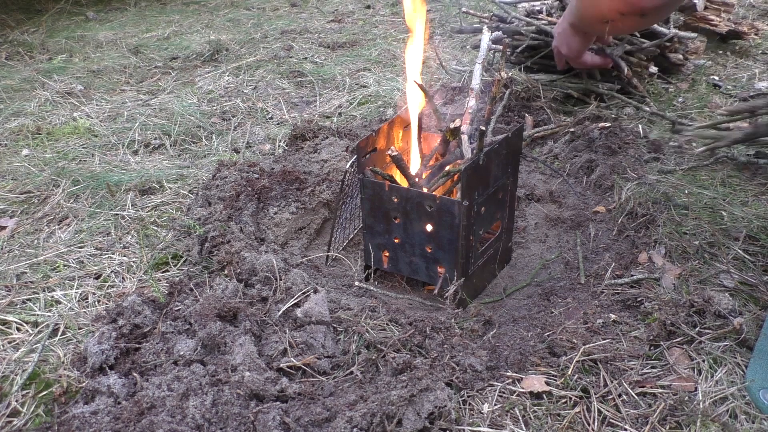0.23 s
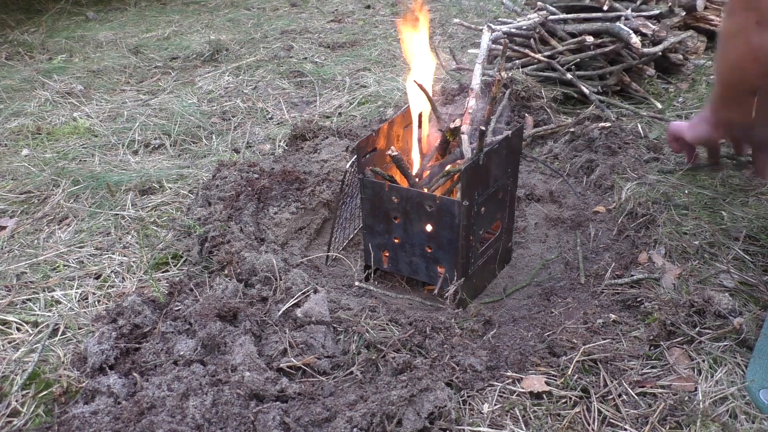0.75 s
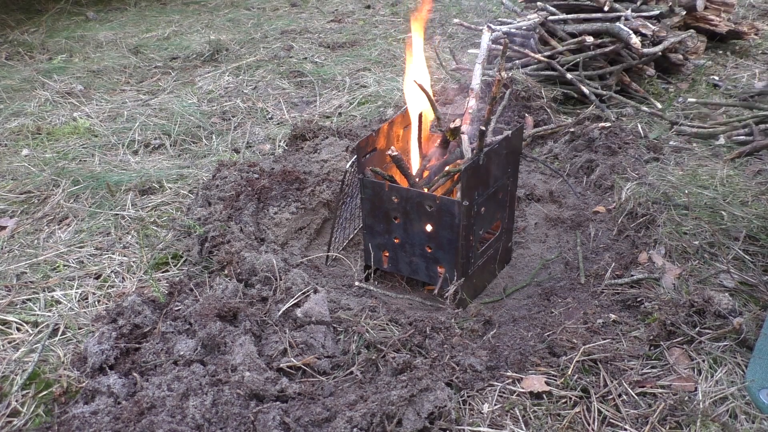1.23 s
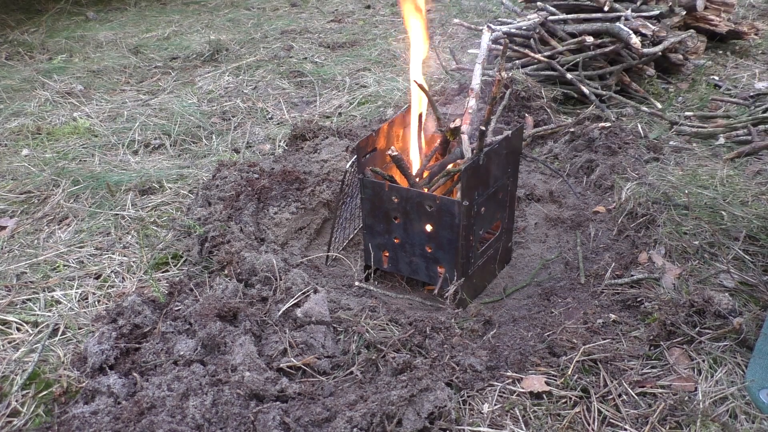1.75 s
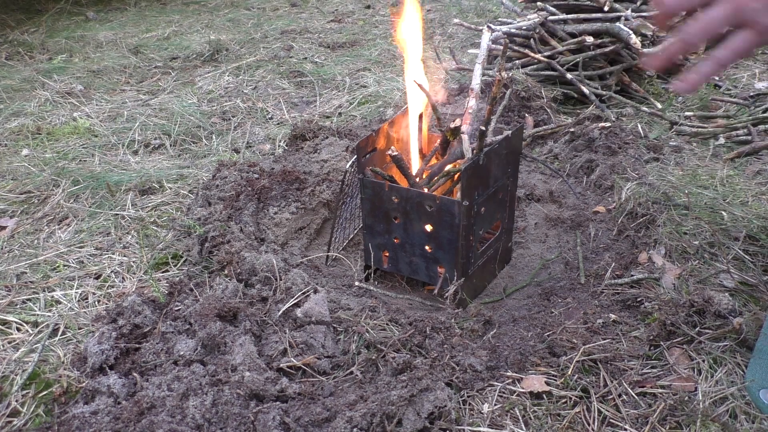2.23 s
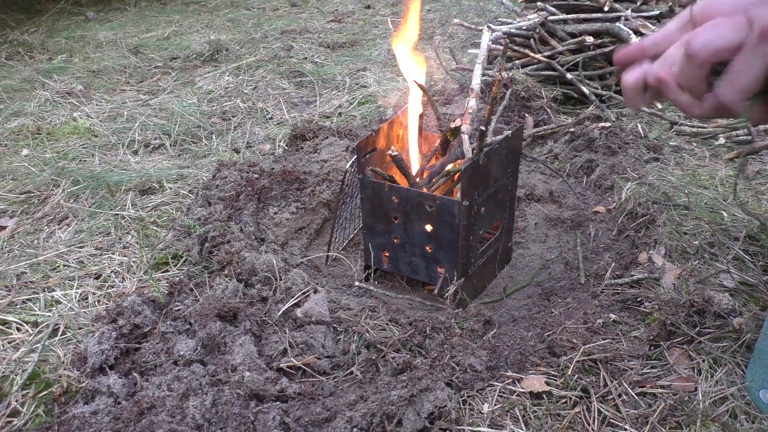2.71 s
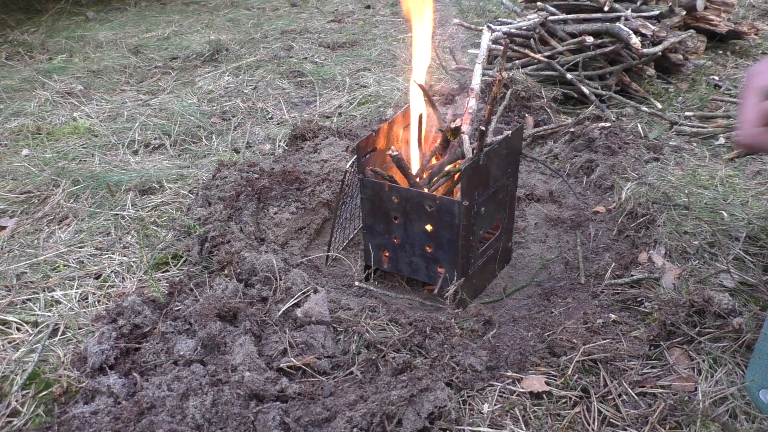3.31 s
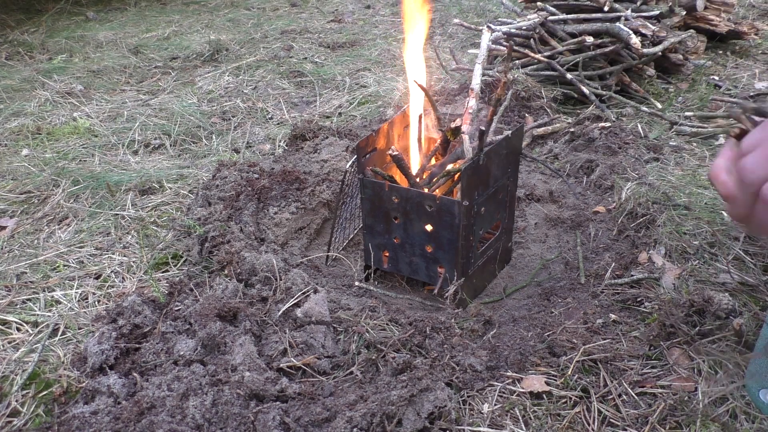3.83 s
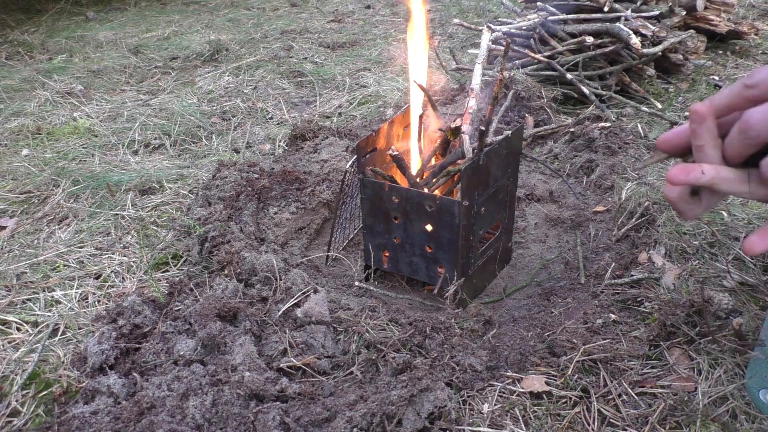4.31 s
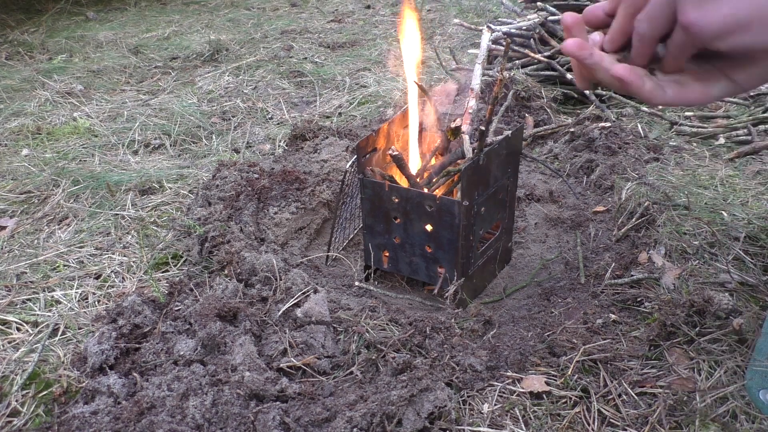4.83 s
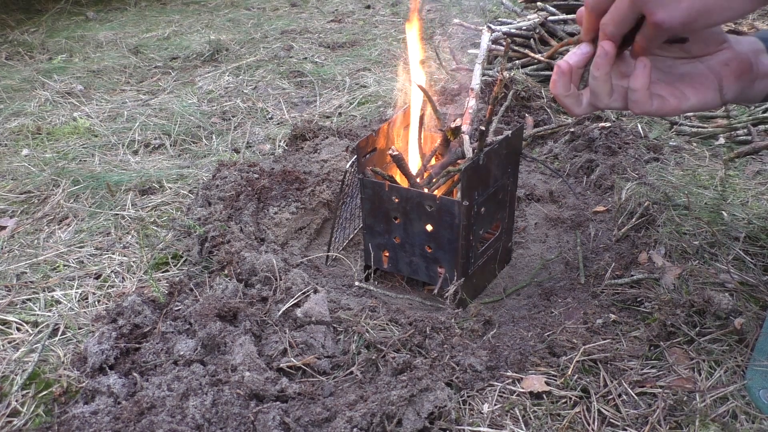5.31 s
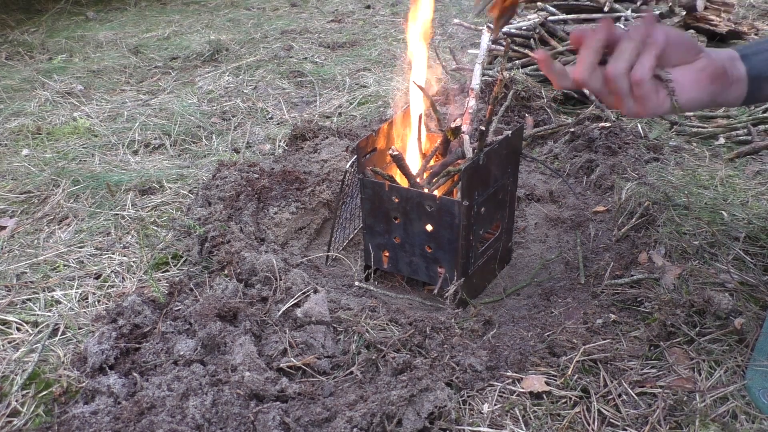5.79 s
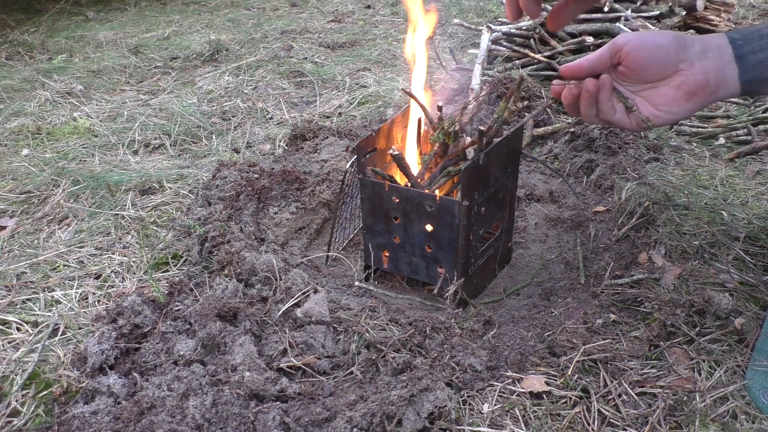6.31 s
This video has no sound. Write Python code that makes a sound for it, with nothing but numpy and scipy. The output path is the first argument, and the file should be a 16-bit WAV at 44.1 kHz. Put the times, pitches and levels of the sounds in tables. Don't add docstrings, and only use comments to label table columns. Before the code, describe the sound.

Crackly bark rustle and dry knocks of twig on twig open the scene, then calm to soft thuds on the ground. Hard, bright wood cracks burst out in the middle, the loudest about three seconds in, followed by scraping and small splintery ticks. Later a faint metallic tap, hollow breathy fire flutter, and twigs clattering into a sheet-metal stove. Open air, dry, nearly mono, close microphone whose level ducks after loud snaps.

```python
import sys
import numpy as np
from scipy import signal
from scipy.fft import rfft, irfft, next_fast_len
from scipy.io import wavfile

SR = 44100
rng = np.random.default_rng(int(sys.argv[2]) if len(sys.argv) > 2 else 0)


def level_to_linear(level):
    exponent = np.asarray(level, float) / 20
    return 10 ** exponent


def transcribe(signal):
    frames = np.atleast_2d(signal).T
    limited = np.clip(frames, -1, 1)
    pcm = np.round(limited * 32767).astype(np.int16)
    wavfile.write(sys.argv[1], SR, pcm)


N = 288844


def rms_one(x):
    return x / np.sqrt(np.mean(x ** 2) + 1e-20)


def peak_one(x):
    return x / np.abs(x).max()


def in_time(rows):
    s, *columns = np.transpose(rows)
    return [np.interp(np.arange(N) / SR, s, column) for column in columns]


def colour(x, points):
    hz, db = np.transpose(points)
    size = 2 * next_fast_len(len(x) // 2 + 1, real=True)
    grid = np.maximum(np.fft.rfftfreq(size, 1 / SR), 1)
    gain = level_to_linear(np.interp(np.log(grid), np.log(hz), db))
    folded = irfft(np.log(gain), size)
    folded[1:size // 2] *= 2
    folded[size // 2 + 1:] = 0
    return irfft(rfft(x, size) * np.exp(rfft(folded)), size)[:len(x)]


def shaped_noise(points):
    return rms_one(colour(rng.standard_normal(N), points))


def bandpass(x, low_hz, high_hz):
    return signal.lfilter(*signal.butter(2, [low_hz, min(high_hz, .48 * SR)], "band", fs=SR), x)


def drift(rate):
    r = np.exp(-40 * np.pi * rate / SR)
    slow = signal.lfilter([1], [1, -2 * r, r * r], rng.standard_normal(N // 20 + 2002))[2000:]
    return np.interp(np.arange(N) / 20, np.arange(len(slow)), rms_one(slow))


def ring(clicks, hz, t60):
    r = level_to_linear(-60 / (t60 * SR))
    w = 2 * np.pi * min(hz, .45 * SR) / SR
    return signal.lfilter([0, np.sin(w)], [1, -2 * r * np.cos(w), r * r], clicks + 1e-18)


def add(track, s, sound):
    i = round(s * SR)
    track[i:i + len(sound)] += sound[:len(track) - i]


def crack(fibres, wood_hz, splinter_db, low_db, ms, cycles, first, after_db, tail_db):
    splinter_hz = [7600, 8760, 13600]
    t = np.arange(len(fibres)) / SR * 1000
    dying = np.exp(-t / max(ms, .1)) + level_to_linear(after_db) * np.exp(-t / 1.84) + level_to_linear(tail_db) * np.exp(-t / 5.0)
    run = fibres * np.abs(fibres) * dying
    run[4] += first
    wood = bandpass(ring(run, wood_hz, cycles / wood_hz), 0.35 * wood_hz, 21000)
    wood = bandpass(wood, 0.56 * wood_hz, 2.56 * wood_hz)
    splinter = bandpass(run, 1900, 21000) + 0.33 * sum(ring(run, hz, 1.74 / hz) for hz in splinter_hz)
    splinter = bandpass(splinter, 4680, 18160)
    low = bandpass(run, 200, 2170)
    return peak_one(wood) - level_to_linear(splinter_db) * peak_one(splinter) + level_to_linear(low_db) * peak_one(low)


def twigs(rows, trim_db, **make):
    out = np.zeros(N)
    for (s, db, *kind), fibres in zip(rows, rng.standard_normal((len(rows), 1500))):
        add(out, s, level_to_linear(db + trim_db) * crack(fibres, *kind, **make))
    return out


def gliding_noise(rows, half_width_hz):
    db, hz = in_time(rows)
    t = np.arange(N) / SR
    rub = signal.lfilter(*signal.butter(2, half_width_hz, fs=SR), rng.standard_normal((2, N)))
    wander = 0.048 * drift(25.9)
    turn = 2 * np.pi * np.cumsum(hz * (1 + wander)) / SR
    moved = rms_one(rub[0] * np.cos(turn) + rub[1] * np.sin(turn))
    return (t > rows[0][0]) * (t < rows[-1][0]) * level_to_linear(db) * moved


def air():
    # frequency in Hz, level in dB per Hz
    air_tone = [(180, -28), (300, -3.5), (722, -9), (797, -7.5), (895, -8.5), (1820, -17), (2300, -18.5),
                (5810, -24), (15700, -21.5)]
    return shaped_noise(air_tone) * level_to_linear(-62 - 1.5 + 0.44 * drift(1.2))


def flame():
    # time in seconds, level in dB
    flutter = [(0.0, -51.5), (0.88, -53), (1.37, -48.5), (1.73, -50.5), (2.13, -50.5), (3.1, -52.5),
               (3.41, -56), (3.72, -52), (4.05, -51), (4.9, -52.5), (5.47, -49.5), (5.8, -49), (6.0, -48.5),
               (6.55, -50)]
    # frequency in Hz, level in dB per Hz
    flame_tone = [(8.8, -32), (15, -3), (43, 3), (119, -0.5), (150, -2), (227, -8), (283, -16), (330, -18),
                  (430, -56), (730, -120)]
    flame_db, = in_time(flutter)
    return shaped_noise(flame_tone) * level_to_linear(flame_db + 1.5 + 0.96 * drift(5.0))


def hollow_drone():
    # time in seconds, level in dB
    swells = [(0, -80), (.33, -56), (.42, -71), (1.55, -64), (1.7, -54), (1.9, -66), (4.3, -63),
              (4.55, -55), (4.8, -65), (5.0, -50), (5.25, -64.5), (5.55, -50), (5.72, -59), (5.9, -49),
              (6.1, -62), (6.55, -56)]
    return gliding_noise([(*row, 150) for row in swells], 12)


def strokes(rows, rise_db_s, fall_db_s):
    t, out = np.arange(N) / SR, 0
    for s, hold, db, fine_db, dull_db in rows:
        away_db = rise_db_s * np.maximum(s - t, 0) + fall_db_s * np.maximum(t - s - hold, 0)
        out = out + level_to_linear(2 * (db - away_db)) * level_to_linear(2 * np.array([[0], [fine_db], [dull_db]]))
    return out


def effort():
    # start in seconds, hold in seconds, bark level in dB,
    # fine scrape in dB re bark, dull knock in dB re bark.
    rubs = [(0.0, 0.032, -46.5, -4.5, -8), (.43, .03, -64, -0.5, -12), (1.57, 0.036, -66, 0.5, -15),
            (.86, 0.021, -64, 1, -1), (1.36, 0.0092, -60, -4.5, 5), (2.21, 0.026, -61, -6.5, -16),
            (2.625, 0.014, -57, -4, -6), (2.735, 0.016, -66.5, 5, -17), (2.94, 0.026, -59, -0.5, -17),
            (3.34, 0.013, -46, -2, -17.5), (3.77, 0.022, -67, -7, 13), (3.92, 0.026, -54, -12, -8),
            (3.97, 0.069, -51.5, -1.5, -2), (4.5, 0.089, -58, -0.5, 2.5), (4.7, 0.025, -65.5, 3, -10),
            (4.87, 0.005, -63, 3, -10), (5.14, .02, -62, -1.5, 0), (5.27, 0.13, -66.5, -2.5, -0.5),
            (6.24, 0.0052, -63.5, -1, 6)]
    drags = [
        (.13, 0.053, -57, 4.5, -2.5),
        (.22, 0.11, -56, -5, -5.5),
        (.5, 0.12, -50, -7.5, -5),
        (1.645, 0.083, -57, -5, -20),
        (2.28, 0.016, -64.5, -26, 7.5),
        (3.38, 0.22, -57, 5.5, 2),
        (6.4, 0.016, -59, -27, 8),
    ]
    jolts = [
        (.645, 0.013, -61, 0.5, -10),
        (1.2, 0.049, -47.5, -12, -1),
        (2.044, 0.0098, -41.5, 1, -6),
        (2.329, 0.0031, -48, 6.5, 2),
        (3.1, 0.0073, -53.5, 8.5, -31),
        (3.232, 0.03, -52, 10.5, -15),
        (6.03, .004, -56.5, 2.5, 10),
        (6.165, 0.004, -53, -15, 5.5),
    ]
    scrapes = [(2.419, .021, -43, -12, -26), (2.475, .026, -47, -9, -20), (2.82, .07, -58, 3, -3),
               (3.068, .012, -50, 4, -15), (3.26, .04, -53, -2, -8), (3.687, .014, -57, -2, 14),
               (4.056, .022, -53, 3, -3), (4.31, .07, -58, 3, -8), (5.99, .025, -67, 3, -2),
               (6.068, .036, -52, -5, 0.5), (6.146, .022, -47, -1, -8)]
    # bark, fine and dull level [dB]
    resting_db = [-69, -72.5, -64]
    moving = strokes(rubs, 100, 110) + strokes(drags, 186, 910)
    moving = moving + strokes(jolts, 2509, 242) + strokes(scrapes, 2509, 910)
    return 10 * np.log10(moving + level_to_linear(2 * np.array(resting_db))[:, None])


def grains(low_hz, high_hz, per_s, clumps, uneven_db, cycles, patchy_db):
    sizes = level_to_linear(uneven_db * np.minimum(rng.exponential(1, N), 4)) * rng.choice([-1, 1], N)
    born = rng.random(N) < per_s * clumps / SR
    dealt = rng.integers(0, 12, N)
    patches = level_to_linear(patchy_db * rng.standard_normal((12, N // 1100 + 1)))[dealt, np.arange(N) // 1100]
    hits = sizes * born * patches
    pitches = np.geomspace(low_hz, high_hz, 12)
    return rms_one(sum(ring(hits * (dealt == k), hz, cycles / hz) for k, hz in enumerate(pitches)))


def rustle():
    bark_db, fine_db, dull_db = effort()
    slip = level_to_linear(1.3 * drift(90) + .3 * drift(16))
    bark = grains(1940, 4370, 4000, slip, uneven_db=3.5, cycles=6.6, patchy_db=2.5) * level_to_linear(bark_db - 1.98)
    fine = grains(4140, 18000, 8000, slip, uneven_db=2.4, cycles=4.3, patchy_db=5.0) * level_to_linear(fine_db + 0.67)
    dull = grains(394, 1460, 2200, slip, uneven_db=2.0, cycles=5.5, patchy_db=3.5) * level_to_linear(dull_db - 3.0)
    return slip * (bark + fine + dull)


def crackles():
    # start in seconds, peak in dB, wood pitch in Hz
    stray = [(.012, -39, 2300), (.043, -38, 3000), (.052, -47, 2000), (.1521, -35, 6500), (.168, -37, 2500),
             (.18, -36, 4230), (.236, -35.5, 7000), (.25, -43, 7000), (.298, -40, 7500), (.4953, -42, 2260),
             (.5, -38, 2420), (.565, -30.5, 2500), (.6594, -44, 4240), (3.261, -35, 600),
             (3.293, -31, 1100), (3.348, -25, 2230), (3.385, -40, 980), (3.405, -43, 810),
             (3.4878, -38, 4940), (3.555, -33.5, 2980), (3.752, -46, 5040), (3.845, -46, 7500),
             (3.876, -40, 1900), (3.926, -36, 3000), (3.976, -36.5, 1500), (4.014, -33.5, 2000),
             (4.178, -42, 2500), (4.262, -41, 7000), (4.325, -42, 2500), (4.371, -41, 2220),
             (4.676, -43.5, 2100), (4.722, -57, 4500), (6.003, -44, 910), (6.074, -40, 660),
             (6.086, -38, 2500), (6.228, -56, 980), (6.366, -44, 3720), (6.483, -50, 754)]
    return twigs(stray, -2.4, splinter_db=-9.5, low_db=-24, ms=1.3,
                 cycles=7.8, first=1.2, after_db=-12.5, tail_db=-23)


def raps():
    # start in seconds, peak in dB, wood pitch in Hz
    dull_raps = [(.0195, -39, 5000), (.0445, -36, 3700), (.289, -37.5, 2500), (.5885, -33, 3600),
                 (.589, -36.5, 1500), (.631, -36, 2310), (.637, -36, 2500), (1.206, -44, 3000),
                 (1.2845, -42, 2500), (1.347, -42, 2700), (1.41, -47, 3320), (6.147, -35, 3020),
                 (6.028, -36.5, 326)]
    return twigs(dull_raps, -2.5, splinter_db=-28, low_db=-24, ms=2.0,
                 cycles=10.0, first=1.4, after_db=-15, tail_db=-20)


def small_ticks():
    # start in seconds, peak in dB, wood pitch in Hz.
    flecks = [(.03, -32, 4610), (.0946, -29, 6260), (2.02, -48, 6760), (2.0524, -30, 8700),
              (2.167, -40, 9000), (2.7898, -34.5, 7500), (3.0694, -29, 7900), (3.2022, -29, 6460),
              (3.223, -26, 4740), (3.26, -38, 7560), (3.5452, -39, 4500), (3.839, -41, 8100),
              (3.9932, -27, 8230), (4.145, -44, 7900), (4.1516, -29.5, 7920), (4.265, -38, 8000),
              (4.4885, -38.5, 4980), (4.5298, -38, 5710), (4.82, -37.5, 4610), (5.77, -46, 3960),
              (5.792, -39.5, 8230), (6.0, -34.5, 7800), (6.007, -53, 8980)]
    ticks = [(.2153, -45, 2540), (.235, -40.5, 2290), (.5116, -36, 2270), (.5407, -36, 2970),
             (6.0975, -37.5, 3520), (.6167, -38, 3300), (1.213, -43, 2000), (.8361, -45.5, 2760),
             (1.2054, -58, 3060), (1.687, -40, 3220), (1.7976, -49, 3160), (2.082, -33, 1510),
             (2.4287, -29.5, 3100), (2.4965, -35, 2620), (2.665, -35, 2760), (2.8406, -40, 2540),
             (3.3404, -36, 2180), (3.593, -32, 2880), (3.6897, -40, 1300), (4.0306, -32, 3900),
             (4.111, -35, 2200), (4.29, -40.5, 1040), (6.0737, -33, 3720), (6.3636, -40, 770),
             (6.398, -50, 3560)]
    splits = [(.27, -43, 2460), (.3147, -43.5, 4730), (1.1988, -57, 1560), (1.2506, -37, 1700),
              (2.6127, -47.5, 2130), (2.7247, -51, 3220), (2.8197, -48, 2760), (3.9143, -36, 3900),
              (3.966, -39, 4600), (4.135, -37.5, 1010), (4.342, -43, 8100), (4.9852, -49.5, 3900),
              (5.239, -55, 5860), (5.2687, -52, 4600), (5.3772, -49, 4000), (5.4173, -46, 4700),
              (5.6461, -51.5, 958), (5.782, -53, 3490), (5.912, -54.5, 12000), (5.9837, -40.5, 2130),
              (6.0859, -35, 6100), (6.099, -41, 1360)]
    knocks = [(.2873, -48, 2930), (.5462, -41, 2140), (.8687, -52, 860), (1.2224, -37.5, 1330),
              (1.281, -45, 1760), (1.362, -44, 3020), (1.409, -58, 2840), (2.0769, -31, 1320),
              (2.123, -42, 1390), (2.2557, -46, 2440), (2.2808, -51, 915), (2.453, -42.5, 1720),
              (2.9427, -46.5, 3230), (3.7523, -49, 1700), (3.8546, -47.5, 1174), (4.0567, -44, 1071),
              (4.1722, -40.5, 1650), (5.672, -49.5, 2400), (6.0277, -40, 829), (6.1267, -46, 2220),
              (6.2284, -46, 4870)]
    soft = dict(cycles=7.6, first=0.92, after_db=-17.5, tail_db=-14.0)
    out = twigs(flecks, -3.5, splinter_db=-13.5, low_db=-11, ms=0.82, **soft)
    out += twigs(ticks, -1.5, splinter_db=-5.5, low_db=-6.5, ms=1.9, **soft)
    out += twigs(splits, -0.77, splinter_db=3.5, low_db=1.0, ms=1.8, **soft)
    out += twigs(knocks, -3.0, splinter_db=-0.5, low_db=7.5, ms=2.7, **soft)
    return out


def pops():
    # start in seconds, peak in dB, wood pitch in Hz
    dry_pops = [(.5763, -37, 3900), (1.2255, -29.5, 2500), (1.2385, -35, 4500), (1.362, -41, 4000),
                (1.39, -46, 5000), (1.687, -41, 6000), (1.715, -43, 1800), (1.77, -46, 2000),
                (4.136, -32, 1990), (4.172, -34, 2620), (5.16, -43, 4000), (5.239, -42, 5900),
                (5.27, -43, 2500), (5.3772, -36.5, 3020), (5.4165, -39.5, 3500), (5.465, -51, 3500),
                (5.778, -47, 7200), (6.228, -42, 4900), (6.397, -38, 2800), (6.365, -42, 2000),
                (5.9837, -35, 3380), (.031, -35, 3500), (.5116, -32.5, 1600), (.5475, -41, 3000),
                (.617, -35, 2000), (3.0895, -39, 5000), (3.111, -41, 4000)]
    return twigs(dry_pops, -1.9, splinter_db=-7.5, low_db=-7, ms=0.13,
                 cycles=2.7, first=7.7, after_db=-21, tail_db=-40)


def specks():
    # start in seconds, peak in dB, pitch in Hz
    bright = [(.279, -38, 10000), (.4715, -45, 8000), (.479, -45, 7500), (.4955, -43, 9000),
              (2.988, -42, 9000), (2.996, -38, 12000), (3.113, -40, 13000), (3.342, -33, 7500),
              (4.145, -36, 8000), (4.342, -30.5, 10000), (4.82, -46, 6600), (5.984, -38, 7950),
              (5.99, -40, 7500), (5.995, -43, 7980), (6.006, -42, 9500), (6.021, -49, 5000),
              (6.052, -46, 8000), (6.069, -41, 7000), (6.0915, -34, 7200), (6.127, -39, 9200),
              (3.214, -39.5, 5000)]
    return twigs(bright, -2.5, splinter_db=-20, low_db=-30, ms=.5,
                 cycles=9.7, first=1.5, after_db=-20, tail_db=-30)


def snapping():
    # start in seconds, wood peak in dB, wood pitch in Hz, splinter in dB re wood, low part in dB re wood
    snaps = [(0.5763, -22.5, 3660, -35, -16), (2.0411, -17, 4200, 13.5, 1.5), (2.1057, -17.5, 3530, -8, -8),
             (2.109, -22.5, 2430, 3, 1), (2.306, -33.5, 3120, -3, -21), (2.326, -9, 3070, 8.5, -25),
             (2.976, -32, 4280, 1.5, 0.5), (3.0156, -11, 2380, 0, -30), (3.0203, -5.5, 2900, 5.5, -40),
             (3.0988, -3, 3500, 8, -22), (3.1349, -24.5, 5050, 24.5, 0), (3.2277, -4.5, 4060, 13.5, -6.5),
             (3.644, -43.5, 7600, 8.5, 2.5), (3.685, -46, 1516, 0, 17), (4.248, -30.5, 4400, -19, -1.5),
             (6.1452, -38, 3170, 10, -24), (6.158, -28, 3830, -6, -18)]
    clean_ms, slower_per_db = 0.18, 0.7864
    breaks = [(*row, clean_ms * level_to_linear(-slower_per_db * row[1])) for row in snaps]
    return twigs(breaks, -1.73, cycles=13.0, first=7.6, after_db=-11, tail_db=-76)


def broken_halves():
    # start in seconds, peak in dB, wood pitch in Hz
    halves = [
        (2.0409, -11.5, 2700),
        (2.041, -24, 890),
        (2.3262, -20.5, 1520),
        (3.2277, -8, 2050),
        (3.2278, -19, 946),
        (3.0156, -10.5, 7040),
        (3.1352, -13.5, 3260),
    ]
    return twigs(halves, -2.64, splinter_db=-32.5, low_db=-32, ms=0.11,
                 cycles=6.6, first=5.3, after_db=-21, tail_db=-52)


def ringing_shards():
    # start in seconds, level in dB, pitch in Hz, t60 in seconds
    shards = [(2.0412, -20, 8480, 0.011), (2.0411, -15.5, 4540, 0.0073), (2.0411, -15, 14000, 0.0044),
              (2.326, -18, 8600, 0.0074), (2.326, -16.5, 13700, 0.0055), (2.326, -17, 16100, .004),
              (3.0204, -6, 2280, 0.0052), (3.0204, -19, 14000, .004), (3.2274, -18, 3490, .005),
              (3.2277, -16, 7930, .009), (3.2277, -15.5, 8460, .009), (3.2278, -11.5, 5730, 0.0076)]
    out, click = np.zeros(N), np.eye(1, 1500)[0]
    for s, db, hz, t60 in shards:
        add(out, s, level_to_linear(db) * bandpass(ring(click, hz, t60), .6 * hz, SR))
    return out


def recoils():
    # start in seconds, peak in dB, wood pitch in Hz
    springs = [
        (3.0987, -4, 2640),
        (3.0203, -25, 2160),
    ]
    back = twigs(springs, -2.0, splinter_db=-35, low_db=-45, ms=0.094,
                 cycles=6.0, first=9.3, after_db=-30, tail_db=-57.0)
    return -bandpass(back, 1800, 12000)


def loud_breaks():
    out = snapping() + broken_halves() + ringing_shards()
    echo = level_to_linear(-11.5) * bandpass(out, 5470, 15130)
    add(out, 1.4 / 1000, echo)
    return out + recoils()


def bumps():
    # start in seconds, peak in dB, pitch in Hz
    thuds = [(1.221, -35, 152), (1.243, -32, 186), (1.399, -35, 81), (2.276, -30.5, 172),
             (2.551, -35.5, 143), (2.959, -37, 111), (4.951, -36.5, 136), (5.152, -33, 99),
             (6.03, -36, 114.4), (1.408, -35.5, 190), (1.99, -39, 55), (6.38, -38, 89.5)]
    out = np.zeros(N)
    for s, db, hz in thuds:
        push = np.r_[np.hanning(round(.4 * SR / hz)), np.zeros(3000)]
        add(out, s, level_to_linear(db) * peak_one(ring(push, hz, 3.2 / hz)))
    return out


def drawn_twig():
    # time in seconds, level in dB, pitch of the hollow in Hz.
    hand = [
        (3.3, -75, 1700),
        (3.345, -56, 1500),
        (3.39, -51, 950),
        (3.44, -66, 852.4),
        (3.49, -63, 647.4),
        (3.56, -56, 556.4),
        (3.6, -67, 496),
        (3.85, -57.5, 552),
        (4.07, -57, 560),
    ]
    draw = [
        (3.31, -75, 1890),
        (3.35, -67, 2200),
        (3.39, -46, 4120),
        (3.46, -65, 5090),
        (3.52, -67, 7220),
        (3.585, -52, 8100),
        (3.6, -80, 8000),
    ]
    return gliding_noise(hand, 64) + gliding_noise(draw, 600)


def metal():
    # pitch in Hz, level in dB, t60 in seconds
    part_modes = [(1114, -16, 0.38), (1943, -18, .3), (2680, -23, 0.3), (3688, -22, 0.3), (3900, -16, 0.3),
                  (4848, -16, 0.63), (6067, -11, .2), (6494, -9, 0.2), (7170, -3, 0.2), (7770, 1.5, 0.19)]
    # start in seconds, level in dB, tilt in dB per octave
    part_taps = [
        (4.565, -46.5, -3.5),
    ]
    # start in seconds, level in dB, pitch in Hz, t60 in seconds
    nudges = [
        (4.694, -64, 2702, .5),
        (4.69, -66, 4852, .6),
        (4.58, -66, 2697, .5),
        (4.755, -64, 6070, .2),
        (4.74, -59, 1114, .35),
    ]
    # start in seconds, level in dB, pitch in Hz, t60 in seconds
    wall_pings = [(6.158, -47.5, 3785, 0.17), (6.16, -51, 1300, 0.17), (6.158, -42, 3230, 0.071),
                  (6.228, -54, 3780, 0.18), (6.236, -54, 1400, .12), (6.3, -64, 2268, .5),
                  (6.366, -48, 3770, 0.03), (6.233, -49.5, 1620, 0.091), (6.17, -50, 1615, .05),
                  (6.228, -50, 5000, .04), (6.25, -47, 612, 0.2), (6.294, -45.5, 2260, 0.083),
                  (6.366, -46.5, 2000, 0.045), (6.396, -44.5, 3435, 0.064), (6.398, -52, 4500, 0.065),
                  (6.397, -44, 2220, 0.025), (6.40, -39.5, 493, 0.17)]
    out, click = np.zeros(N), np.eye(1, SR // 2)[0]
    for s, db, tilt_db in part_taps:
        for hz, mode_db, t60 in part_modes:
            add(out, s, level_to_linear(db + mode_db + tilt_db * np.log2(hz / 4000)) * ring(click, hz, t60))
    for s, db, hz, t60 in nudges + wall_pings:
        add(out, s, level_to_linear(db) * ring(click, hz, t60))
    return out


def gusts():
    # time in seconds, level in dB, pitch in Hz
    upper_mode = [
        (4.9, -71, 400),
        (4.98, -61, 399.5),
        (5.3, -78, 360),
        (5.5, -60.5, 360),
        (5.57, -68.5, 360),
        (5.66, -60, 400),
        (6.0, -70, 360),
    ]
    return gliding_noise(upper_mode, 44)


def scene():
    quiet = air() + flame() + hollow_drone() + rustle()
    quiet += crackles() + raps() + small_ticks() + pops() + specks()
    quiet += bumps() + drawn_twig() + metal() + gusts()
    steady_top = signal.ellip(10, .5, 60, 15800, fs=SR, output="sos")
    mono = loud_breaks() + signal.sosfilt(steady_top, quiet)
    return np.array([mono, mono])


def low_pass(x):
    return signal.sosfilt(signal.butter(12, 17170, fs=SR, output="sos"), x)


def record(dry):
    # frequency in Hz, gain in dB
    mic = [(20, -4), (5000, 2.5), (6200, 2), (8000, 5), (9300, 2), (10600, 0.5), (13500, 3.5), (15500, 1),
           (22000, -1)]
    # frequency in Hz, level in dB per Hz
    hiss = [(60, -13.5), (500, -7), (1300, -12.5), (5000, -11), (15500, -8.5), (16000, -51)]
    duck_from_db, duck_share, recover_db_s, duck_ms = -23, 0.31, 38, 8.5
    t = np.arange(N) / SR
    over_db = np.maximum(20 * np.log10(np.abs(dry[0]) + 1e-9) - duck_from_db, 0) * duck_share
    held_db = np.maximum.accumulate(over_db + recover_db_s * t) - recover_db_s * t
    r = np.exp(-1000 / (duck_ms * SR))
    duck_db = signal.lfilter([1 - r], [1, -r], held_db)
    x = colour(dry[0], mic) * level_to_linear(-duck_db)
    x = .95 * np.tanh(x / .95)
    side = shaped_noise(hiss) * level_to_linear(-77.5)
    stereo = x + side * [[1], [-1]]
    top = signal.cheby2(12, 70, 17300, fs=SR, output="sos")
    return low_pass(signal.sosfilt(top, stereo))


dry = scene()
out = record(dry)
transcribe(out)
```